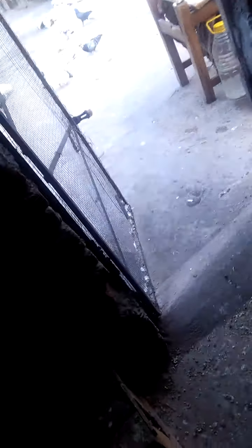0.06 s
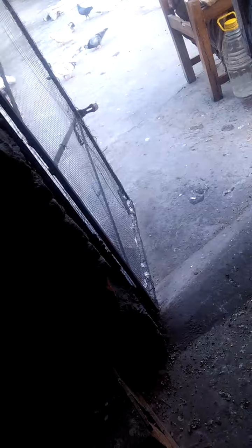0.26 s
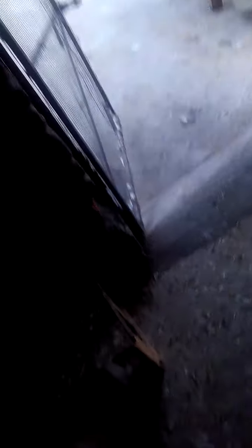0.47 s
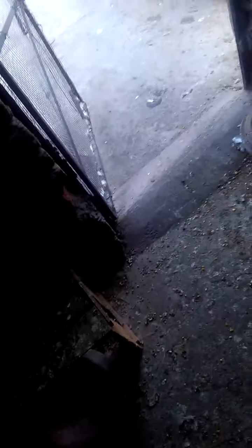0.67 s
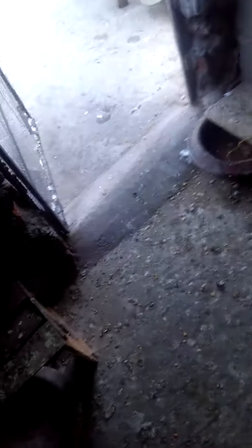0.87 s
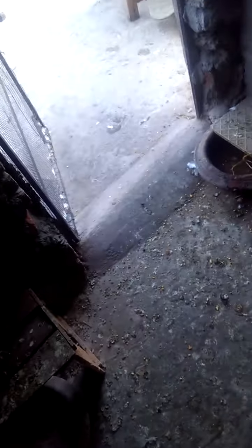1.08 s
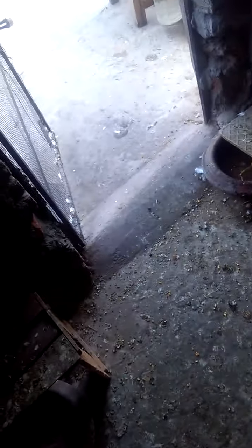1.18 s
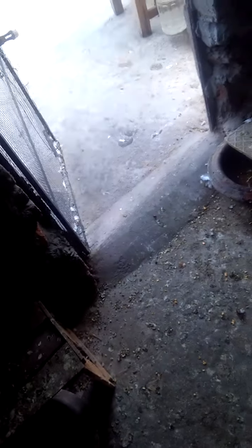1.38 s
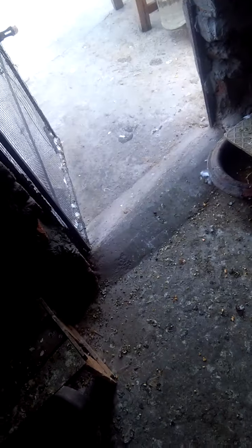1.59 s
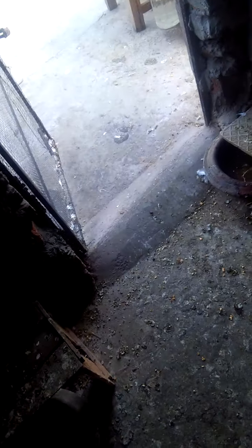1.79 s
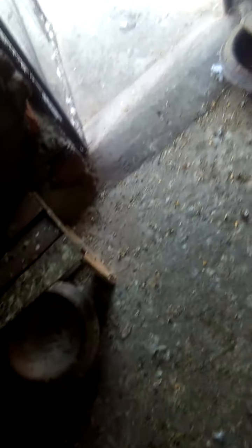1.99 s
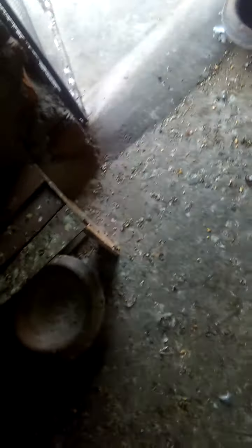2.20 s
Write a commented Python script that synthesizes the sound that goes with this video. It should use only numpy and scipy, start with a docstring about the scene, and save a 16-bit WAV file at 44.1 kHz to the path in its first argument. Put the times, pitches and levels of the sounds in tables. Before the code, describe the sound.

Pigeon cooing in a small concrete loft, one loud throaty coo over a small bird's high trill

```python
"""In a small concrete loft pigeons coo: a farther bird rises and holds, then a near one drops in loudly.
Coos are wavering tones with overtones and breath through a beak; dull low knocks, maybe of wing or throat,
excite the loft's modes. A small bird outside trills high falling chips, swept sines with a noise tail, over
a rasp and a thin peep. Feet scuff, snap, tick and thump on gritty ground, feathers rustle, and the yard adds
faint hiss and rumble."""
import sys
import numpy as np
from scipy import signal
from scipy.fft import rfft, irfft, next_fast_len
from scipy.io import wavfile
from scipy.ndimage import uniform_filter1d, map_coordinates

SR = 44100
rng = np.random.default_rng(int(sys.argv[2]) if len(sys.argv) > 2 else 0)


def master_out(mix):
    """Clip the mix to full scale and print it as 16-bit PCM to the path in sys.argv[1]."""
    frames = np.transpose(np.atleast_2d(mix))
    ceiling = np.clip(frames, -1, 1)
    pcm = np.round(ceiling * 32767).astype(np.int16)
    wavfile.write(sys.argv[1], SR, pcm)


N = 99225
T = np.arange(N) / SR  # seconds

# Faint outdoor hiss spectrum. Each row: frequency in Hz, relative density in dB per Hz.
HISS_SPECTRUM = [(25, -3.5), (110, -4.5), (330, -12.5), (800, -17.5), (2000, -26.5), (5000, -30.5),
                 (7500, -20.5), (10000, -32), (14400, -35.5)]
# Hiss level over time. Each row: time in seconds, level in dB.
HISS_LEVEL = [(0.0, -58), (0.22, -64.5), (0.43, -67), (0.72, -58.5), (0.98, -67), (1.2, -65),
              (1.285, -75.5), (1.34, -67), (1.68, -66.5), (1.74, -76), (1.78, -66.5), (2.01, -64),
              (2.25, -64.5)]
# Low rumble spectrum. Each row: frequency in Hz, relative density in dB per Hz.
RUMBLE_SPECTRUM = [(12, -12), (20, -3), (65, -1.5), (97, 11.5), (189, -0.5), (200, -24), (260, -64.5),
                   (440, -120)]
# Rumble level over time. Each row: time in seconds, level in dB.
RUMBLE_LEVEL = [(0.0, -54.5), (0.55, -63), (0.71, -49.5), (0.87, -67.5), (1.62, -63), (1.73, -68),
                (1.9, -58), (2.25, -73.5)]
PATCH_DB = 1  # standard deviation of the gain patches

# Chips of the trill. Each row: start of the main sweep in seconds, peak level in dB, mid-sweep pitch in Hz.
CHIPS = [(0.017, -41.5, 6880), (0.1055, -42, 7080), (0.191, -42, 7360), (0.2827, -41, 7190),
         (0.376, -40.5, 7170), (0.4704, -40, 7180), (0.565, -44, 6950), (0.658, -41, 7310),
         (0.752, -38.5, 7080), (0.8465, -41, 7060), (0.9366, -48.5, 7400), (1.0283, -49, 7210),
         (1.1192, -43.5, 7330), (1.213, -44, 7050), (1.3079, -47, 7140), (1.3973, -43.5, 7440),
         (1.49, -47.5, 7130), (1.582, -49.5, 6970), (1.673, -51, 7250), (1.7647, -47.5, 7360),
         (1.8558, -41, 7120), (1.9335, -55, 6700), (1.974, -44.5, 7340), (2.0677, -44.5, 7180),
         (2.1656, -51.5, 7120)]
CHIP_S, CHIP_FALL_HZ = 0.0053, 489.5  # length and fall of every note
LOW_HZ, LOW_LAG_S, LOW_DB = 6480, 0.0036, -51  # low end, after the main sweep starts; mean level
LEAD_S, LEAD_HZ, LEAD_DB = 0.013, 6690, -3.5  # low note ahead of the sweep; level relative to the low end
YARD_T60_S, YARD_DB, YARD_GAP_S = 0.12, 1, 0.0025  # echo decay, level over the direct sound, delay
# Spectrum of the rasp under the chips. Each row: frequency in Hz, relative density in dB per Hz.
RASP_SPECTRUM = [(3000, -16.5), (5800, -11.5), (7000, 14.5), (9000, 3), (14500, -24.5)]
RASP_DB, RASP_T60_S = -13.5, 0.2  # level relative to the chip, decay
# A thin high peep. The one row: start in seconds, pitch in Hz, level in dB, t60 in seconds.
PEEP = (.293, 11330, -64, .16)

# Dull low knocks, maybe of wing or throat. Each row: start in seconds, relative level in dB, rise in seconds,
# t60 in seconds.
DULL_KNOCKS = [(.005, -58, 0.006, 1), (.055, -32.5, 0.01592, 0.45), (0.248, -32, 0.0065, 0.24),
               (0.478, -44, 0.012, 0.61), (0.633, -31.5, 0.00324, 0.21), (0.671, -38.5, 0.008, 0.16),
               (1.601, -64, 0.0094, 0.53), (1.76, -57, 0.0056, 1), (1.944, -34.5, 0.00075, 0.36),
               (2.031, -61, 0.011, 0.19), (2.161, -55, 0.03, 0.28)]
# Low resonances of the loft. Each row: frequency in Hz, width in Hz, gain in dB.
LOFT_MODES = [(243.3, 9.8, -4), (289.8, 23.5, 1.5), (333.5, 18.3, -1), (415, 24, 4.5), (504.3, 16.2, -3.5),
              (690, 74, -22), (922, 36, -1)]
KNOCK_NOISE_DB, KNOCK_PULSE_DB = 23.0, 47.5  # gains of noise and one-sample pulse over the knock's level
HEAD_T60_S, HEAD_DB = 0.095, 6.5  # faster decay and its level over the slow one
SOFT_HZ, BOTTOM_HZ = 503, 172  # corners above and below which the knocks are weakened

# Feather rustles. Each row: start in seconds, hold in seconds, level in dB, tilt in dB per octave,
# t60 in seconds.
RUSTLES = [(0.04, 0.096, -66.5, 17.5, 0.52), (.42, 0.32, -70.5, -27, .4), (1.1, 0.24, -73.5, 10.5, 0.11),
           (1.88, 0.19, -60, 1.5, 0.87)]
# Rustle spectrum. Each row: frequency in Hz, relative density in dB per Hz.
FEATHER_SPECTRUM = [(710, -58.5), (1200, -31.5), (1830, 2.5), (2900, -10), (3700, -9.5), (4600, -18.5),
                    (7800, -48), (13200, -120)]
GRIT_PER_S, GRIT_DB = 1500, 7  # grains a second; extra amplitude of a grain over the base noise

# The farther bird's coo. Each row: time in seconds, pitch in Hz, level in dB.
FAR_COO = [(0.15, 320.9, -52.5), (0.178, 350.3, -46), (0.208, 445.7, -37.5), (0.274, 525.7, -54),
           (0.298, 553, -51), (0.312, 446.4, -38), (0.35, 480.7, -47), (0.458, 491, -43.5),
           (0.48, 444, -39)]
# The near coo, a list of two parts: call and low end. Each row: time in seconds, pitch in Hz, level in dB.
NEAR_COO = [
    [(0.468, 414, -48.5), (0.482, 415, -25.5), (0.49, 427, -23.5), (0.504, 325.6, -24.5),
     (0.514, 316.8, -22), (0.526, 310.8, -34.5), (0.55, 321, -25.5), (0.586, 333, -28),
     (0.602, 327.5, -21.5), (0.62, 315, -29), (0.626, 331, -43.5), (0.63, 330, -18.5)],
    [(0.632, 251.5, -30), (0.658, 239.5, -32.5), (0.7, 244, -49.5)],
]
# Resonances that pass overtones and breath. Each row: frequency in Hz, width in Hz, gain in dB.
BEAK_MODES = [(650, 120, -36), (930, 30, -33)]
WAVER, FLUTTER_DB, WAX_DB = .012, .8, 5  # pitch as a fraction, tone level, overtone level
BREATH_DB, LOUD_DB = 9.5, -25  # breath over overtones; tone level where overtone drive equals it

# Crisp snaps of dry litter. Each row: start in seconds, hold in seconds, level in dB, tilt in dB per octave,
# t60 in seconds.
SNAPS = [(.1665, 0.0029, -48, 7, 0.0593), (.689, 0.0043, -46.5, -3.5, 0.084)]
# Snap spectrum. Each row: frequency in Hz, relative density in dB per Hz.
LITTER_SPECTRUM = [(2060, -53), (3500, -16.5), (4570, -1), (5300, -34), (7250, 0.5), (9290, 4.5),
                   (14400, -27.5)]
# Foot scuffs on grit. Each row: start in seconds, hold in seconds, level in dB, tilt in dB per octave,
# t60 in seconds.
SCUFFS = [(.53, 0.11, -66.5, 13.5, .2), (.73, 0.21, -63, 12.5, 0.096), (.84, 0.093, -58, -4.5, 0.058),
          (1.205, 0.041, -63, -1.5, 0.058), (1.474, 0.017, -57, 3, 0.2), (1.755, 0.055, -68.5, 2.5, 0.71),
          (1.845, 0.02, -61.5, -1, 0.25), (1.895, 0.053, -50.5, -1, 0.0097)]
# Scuff spectrum. Each row: frequency in Hz, relative density in dB per Hz.
GRIT_SPECTRUM = [(530, 18.5), (900, -21.5), (1850, -4.5), (2340, -5), (2750, -0.5), (4030, -5), (6350, -1),
                 (11400, -9.5), (14500, -22)]
# Sharp ticks. Each row: time in seconds, relative level in dB.
TICKS = [(.632, -21.5), (1.343, -46.5), (1.946, -35)]
# Resonances struck by a tick. Each row: frequency in Hz, width in Hz, gain in dB.
TICK_MODES = [(960, 540, 2), (2070, 750, -4), (3860, 88, -6.5)]
# Soft thumps. Each row: start in seconds, level in dB, pitch in Hz, t60 in seconds.
THUMPS = [(0.636, -23, 76, 0.093), (.785, -36.5, 58, 0.21), (1.081, -40, 71.3, 0.44),
          (1.085, -54, 145.2, 0.57), (1.165, -42, 107, 0.1), (1.175, -56, 164.3, 0.55),
          (1.225, -44.5, 110, 0.14), (1.801, -49.5, 90.7, 0.29)]
THUMP_RISE_S, THUMP_FLUTTER_DB, THUMP_WAVER = 0.0038, 2, .08  # waver as a fraction of pitch

# Short distant coos. Each row: start in seconds, first pitch in Hz, last pitch in Hz, tail level in dB,
# t60 in seconds.
PUFFS = [(1.611, 492.4, 591, -56, .25), (1.683, 550, 560, -68, 0.1), (1.758, 525, 584, -54, 0.28),
         (1.844, 515, 542, -50.5, 0.11), (1.872, 323.3, 345, -54.5, 1.05), (1.915, 556.7, 588, -56.5, 0.72)]
PUFF_SLIDE_S, PUFF_RISE_S, PUFF_FLUTTER_DB = 0.0288, 0.0057, 5
PUFF_HEAD_T60_S, PUFF_HEAD_DB = 0.08, 7  # faster decay and its level over the tail
ECHO_T60_S, COO_ECHO_DB, PUFF_ECHO_DB = .3, -12, -6  # wall echo decay and its levels

# Stereo spread. Each row: frequency in Hz, side level over mid in dB.
WIDTH = [(500, -72), (3000, -42.5), (5500, -22), (7000, -18), (9000, -3), (14000, -5)]
TOP_HZ = 14450  # band limit


def amp(db):
    """Amplitude ratio of a level in decibels."""
    return 10 ** (np.asarray(db) / 20)


def unit(x):
    """Normalization to unit root-mean-square."""
    return x / np.sqrt(np.mean(x ** 2) + 1e-20)


def along(points, hz):
    """Interpolation of (Hz, value) points on a logarithmic frequency axis."""
    f, v = np.transpose(points)
    return np.interp(np.log(hz + 1), np.log(f + 1), v)


def wobble(rate):
    """Slow random modulation: a smooth curve through rate random knots a second."""
    return map_coordinates(rng.standard_normal(int(N * rate / SR) + 4), [T * rate])


def filtered(x, response):
    """Linear filtering: the spectrum of x times a complex response of frequency."""
    m = next_fast_len(N + SR // 2)
    return irfft(rfft(x, m) * response(np.fft.rfftfreq(m, 1 / SR)), m)[..., :N]


def resonances(table, sign=-1):
    """Modal superposition: causal resonators summed, alternating in polarity when sign is -1."""
    def response(f):
        total = 0
        for k, (center, width, db) in enumerate(table):
            damping = 1j * f * width
            total = total + sign ** k * amp(db) * damping / (center * center - f * f + damping)
        return total
    return response


def burst(start, rise, t60):
    """Transient envelope: saturating rise, exponential decay of 60 dB per t60."""
    u = np.clip(T - start, 0, None)
    return (1 - np.exp(-u / rise)) * amp(-60 * u / t60)


def noise(spectrum):
    """Coloured noise: white noise shaped by a spectral density."""
    return unit(filtered(rng.standard_normal(N), lambda hz: amp(along(spectrum, hz))))


def patchy(x, db):
    """Random modulation in time and frequency: a smoothed field of gains on the short-time spectrum."""
    z = signal.stft(x, nperseg=256)[2]
    field = uniform_filter1d(rng.standard_normal(z.shape), 4, 0)
    field = uniform_filter1d(field, 8, 1)
    return signal.istft(z * amp(db * unit(field)), nperseg=256)[1][:N]


def gritty(rows, spectrum, rise, patch_db):
    """Granular friction: noise with random strong grains rises over a given time, holds and decays."""
    out = np.zeros(N)
    for s, hold, db, tilt_db, t60 in rows:
        def colour(hz):
            tilt = tilt_db * np.log2((hz + 500) / 4000)
            bass_cut = 1 + (800 / (hz + 1)) ** 6
            return amp(along(spectrum, hz) + tilt) / bass_cut
        grains = rng.random(N) < GRIT_PER_S / SR
        grit = rng.standard_normal(N) * (1 + grains * amp(GRIT_DB))
        grit = unit(filtered(grit, colour))
        attack = np.clip((T - s) / rise, 0, 1)
        release = amp(-60 * np.clip(T - s - hold, 0, None) / t60)
        out += attack * release * amp(db + 1.8 * patch_db * wobble(90)) * grit
    return patchy(out, patch_db)


def yard():
    """Stationary noise under slow modulation: faint outdoor hiss and an unsteady low rumble."""
    hiss_db = np.interp(T, *np.transpose(HISS_LEVEL)) + 0.41 * wobble(23)
    rumble_db = np.interp(T, *np.transpose(RUMBLE_LEVEL)) + wobble(15.0)
    return amp(hiss_db) * patchy(noise(HISS_SPECTRUM), PATCH_DB) + amp(rumble_db) * noise(RUMBLE_SPECTRUM)


def trill():
    """Frequency sweeps in a reverberant yard: lead note, falling sweep and low end, each chip with echoes."""
    pad = SR // 10
    out, t = np.zeros(N + SR), np.arange(SR // 20) / SR

    def note(at, hz, db):
        u = np.clip((t - at) / CHIP_S, 0, 1)
        phase = 2 * np.pi * np.cumsum(hz + CHIP_FALL_HZ * (.5 - u)) / SR
        return amp(db) * np.sin(np.pi * u) * np.sin(phase)

    late = np.arange(SR // 4) / SR
    for s, db, mid_hz in CHIPS:
        low_db = LOW_DB + 3.15 * rng.standard_normal()
        chip = note(0, LEAD_HZ, low_db + LEAD_DB) + note(LEAD_S, mid_hz, db)
        chip += note(LEAD_S + LOW_LAG_S, LOW_HZ, low_db)
        tail = rng.standard_normal(len(late)) * amp(-60 * late / YARD_T60_S) * (late > YARD_GAP_S)
        direct = late == 0
        answer = direct + amp(YARD_DB) * tail / np.linalg.norm(tail)
        heard = signal.fftconvolve(chip, answer)
        out[round((s - LEAD_S) * SR) + pad:][:len(heard)] += heard
    return out[pad:][:N]


def chip_rasp():
    """Broadband excitation: a decaying burst of coloured noise under each chip."""
    level = sum(amp(db + RASP_DB) * burst(s - LEAD_S / 2, .006, RASP_T60_S) for s, db, _ in CHIPS)
    return level * patchy(noise(RASP_SPECTRUM), PATCH_DB)


def dull_knocks():
    """Forced resonance: each knock, a pulse and noise decaying fast then slowly, rings the loft's modes."""
    envelope = np.zeros(N)
    for s, db, rise, t60 in DULL_KNOCKS:
        decay = burst(s, rise, t60) + amp(HEAD_DB) * burst(s, rise, HEAD_T60_S)
        envelope += amp(db + KNOCK_NOISE_DB) * decay
    knocks = amp(2.8 * wobble(60)) * rng.standard_normal(N) * envelope
    for s, db, rise, _ in DULL_KNOCKS:
        knocks[round((s + rise) * SR)] += amp(db + KNOCK_PULSE_DB)
    ring = resonances(LOFT_MODES, sign=1)

    def flat(u):  # second-order maximally flat low-pass
        return 1 / (1 + np.sqrt(2) * u + u * u)

    def response(f):
        return ring(f) * flat(1j * f / SOFT_HZ) ** 3 * flat(BOTTOM_HZ / (1j * f + 1e-3)) ** 2
    return filtered(knocks, response)


def rustles():
    """Distributed friction: slow-starting grainy noise with the dull spectrum of feathers."""
    return gritty(RUSTLES, FEATHER_SPECTRUM, .05, 0.83)


def coo(rows):
    """Source and filter: a nearly pure tone, with overtones and breath passed by fixed beak resonances."""
    s, hz, db = np.transpose(rows)
    phase = 2 * np.pi * np.cumsum(np.interp(T, s, hz) * (1 + WAVER * wobble(60.23))) / SR
    edges = np.clip(np.minimum(T - s[0], s[-1] - T) / 0.003, 0, 1)
    level = np.sqrt(2) * edges * amp(np.interp(T, s, db) + FLUTTER_DB * wobble(50.4))
    upper = sum(amp(WAX_DB * wobble(30)) * np.sin(k * phase) for k in (2, 3))
    upper = upper + amp(BREATH_DB) * rng.standard_normal(N)
    drive = level * level / amp(LOUD_DB)  # grows faster than the tone
    beak = resonances(BEAK_MODES)
    return level * np.sin(phase) + filtered(drive * upper, lambda f: beak(f) * (f > 520))


def snaps():
    """Brittle fracture: very short, fast-rising grainy noise of dry litter."""
    return gritty(SNAPS, LITTER_SPECTRUM, 0.0019, 1.7)


def peep():
    """Damped oscillation: one thin high sine decays with a fluttering level."""
    s, hz, db, t60 = PEEP
    return amp(db + 4 * wobble(42)) * burst(s, 0.0072, t60) * np.sin(2 * np.pi * hz * T)


def scuffs():
    """Sliding friction: feet on grit give held, fading grainy noise."""
    return gritty(SCUFFS, GRIT_SPECTRUM, 0.015, PATCH_DB)


def ticks():
    """Impulse response: single-sample strikes excite a few resonances."""
    strikes = np.zeros(N)
    for s, db in TICKS:
        strikes[round(s * SR)] = amp(db + 16)
    return filtered(strikes, resonances(TICK_MODES))


def thumps():
    """Damped oscillation: low sines with wavering pitch and level rise quickly and decay."""
    out = np.zeros(N)
    for s, db, hz, t60 in THUMPS:
        level = amp(db + THUMP_FLUTTER_DB * wobble(39.9)) * burst(s, THUMP_RISE_S, t60)
        pitch = hz * (T > s) * (1 + THUMP_WAVER * wobble(30))
        out += level * np.sin(2 * np.pi * np.cumsum(pitch) / SR)
    return out


def puffs():
    """Frequency glide: a short distant coo opens with a puff and slides up into a wavering, fading tone."""
    out = np.zeros(N)
    for s, from_hz, to_hz, db, t60 in PUFFS:
        slide = np.exp(-(np.clip(T - s, 0, None) / PUFF_SLIDE_S) ** 2)
        hz = to_hz + (from_hz - to_hz) * slide
        phase = 2 * np.pi * np.cumsum(hz * (1 + 2 * WAVER * wobble(70))) / SR
        head = amp(PUFF_HEAD_DB) * burst(s, PUFF_RISE_S, PUFF_HEAD_T60_S)
        decay = burst(s, PUFF_RISE_S, t60) + head
        out += amp(db + PUFF_FLUTTER_DB * wobble(45.13)) * decay * np.sin(phase)
    return out


def walls(x, db):
    """Diffuse reverberation: x plus its convolution with exponentially decaying noise."""
    t = T[:SR // 3]
    tail = rng.standard_normal(len(t)) * amp(-60 * t / ECHO_T60_S)
    return x + amp(db) * signal.fftconvolve(x, tail / np.linalg.norm(tail))[:N]


def scene():
    """Superposition and decorrelation: sources sum at the centre; random phases spread mainly the treble."""
    coos = coo(FAR_COO) + sum(coo(rows) for rows in NEAR_COO)
    loft = walls(coos, COO_ECHO_DB) + walls(puffs(), PUFF_ECHO_DB) + dull_knocks() + rustles()
    outside = yard() + trill() + chip_rasp() + peep()
    feet = snaps() + scuffs() + ticks() + thumps()
    mid = loft + outside + feet
    hz, _, z = signal.stft(mid, SR, nperseg=512)
    turn = np.exp(2j * np.pi * rng.random(z.shape))
    spread = z * turn * amp(along(WIDTH, hz))[:, None]
    side = signal.istft(spread, SR, nperseg=512)[1][:N]
    return np.array([mid + side, mid - side])


def record(dry):
    """Band limitation: nothing is kept at or above the top frequency."""
    return filtered(dry, lambda hz: hz < TOP_HZ)


dry = scene()
out = record(dry)
master_out(out)
```